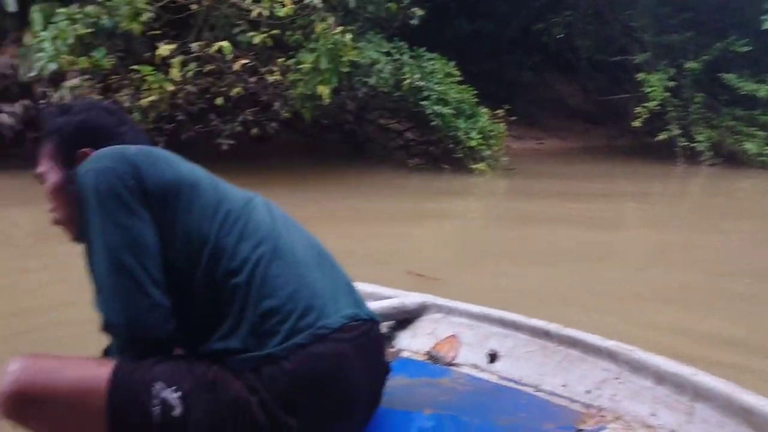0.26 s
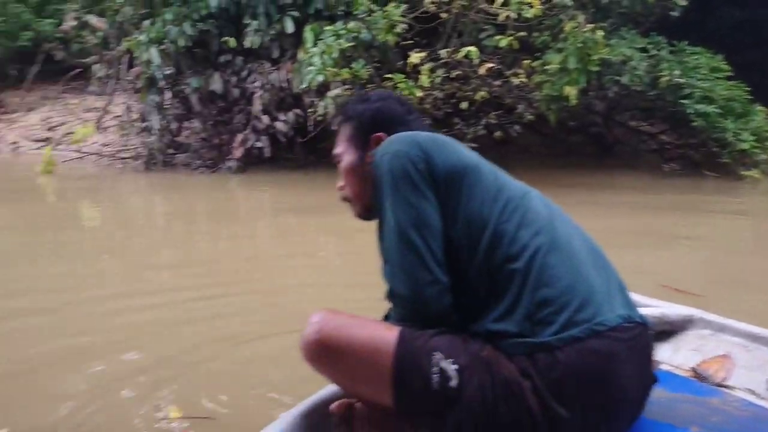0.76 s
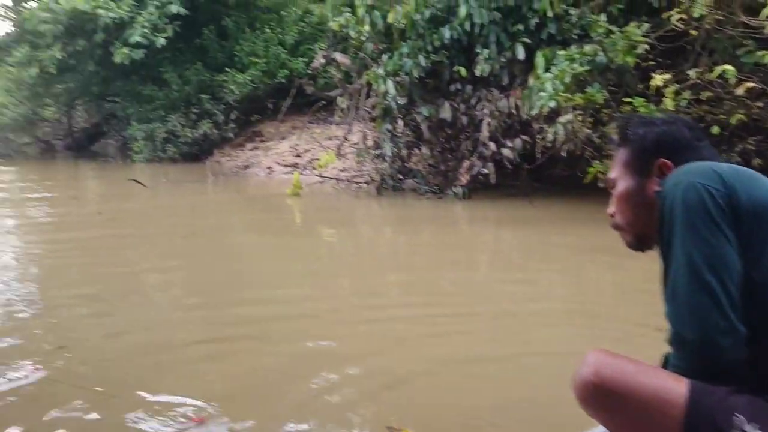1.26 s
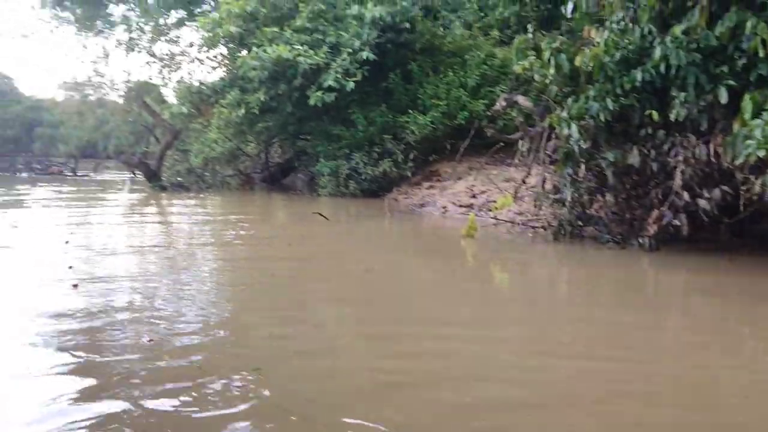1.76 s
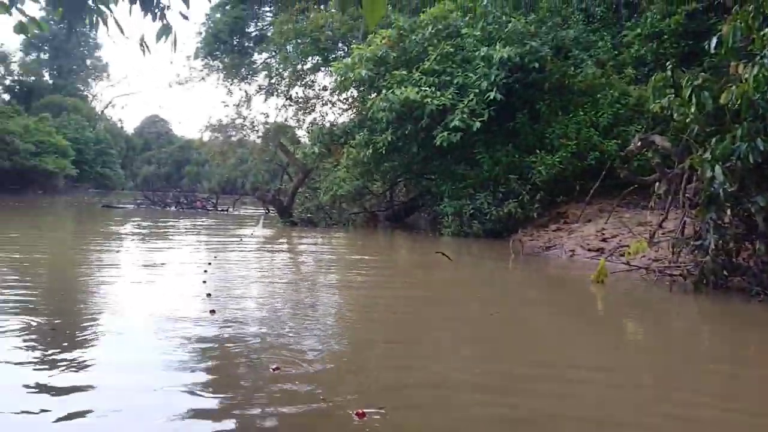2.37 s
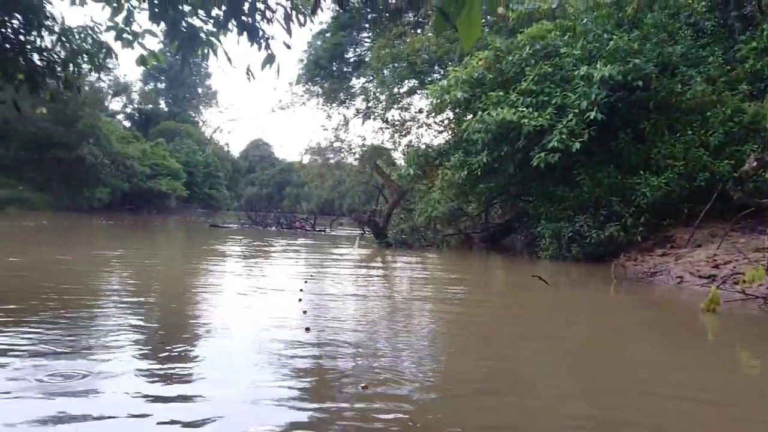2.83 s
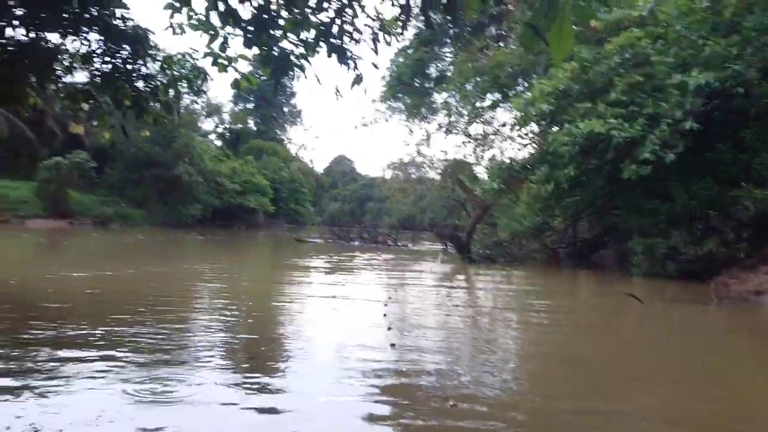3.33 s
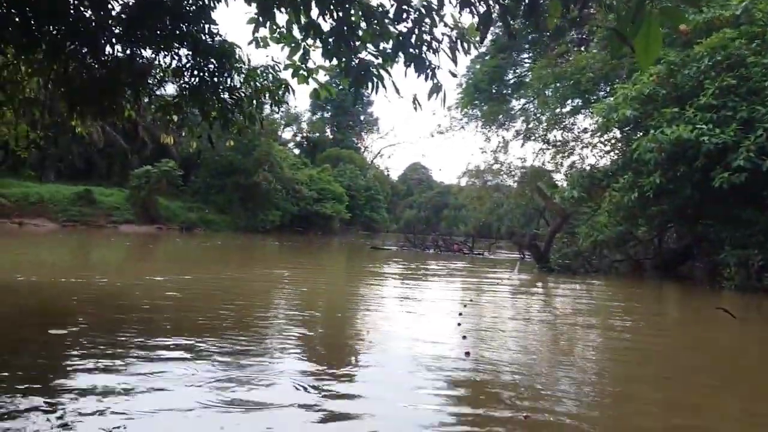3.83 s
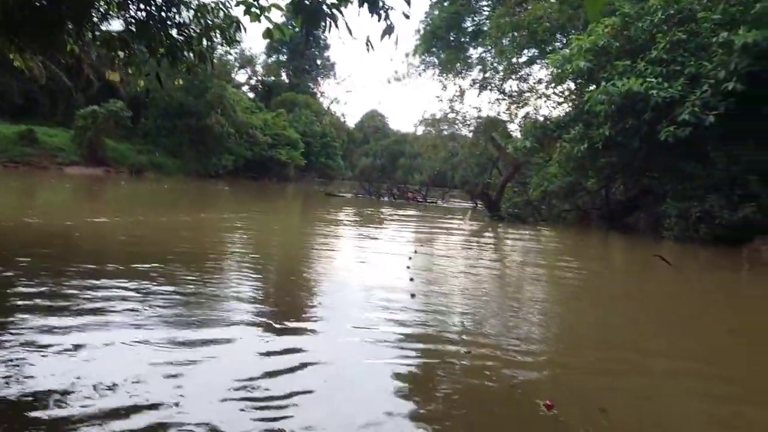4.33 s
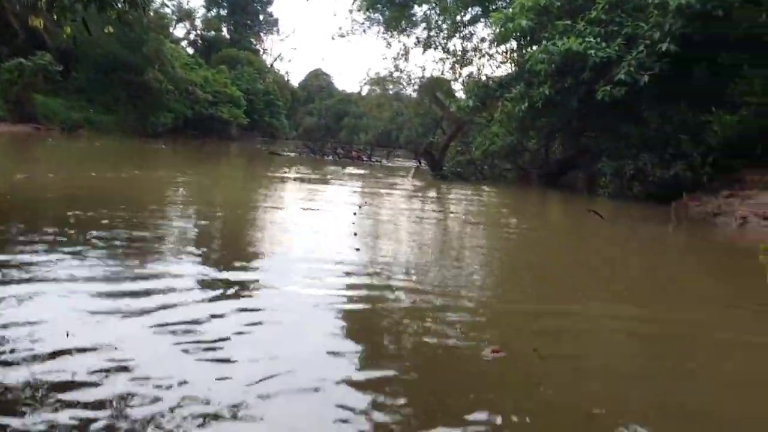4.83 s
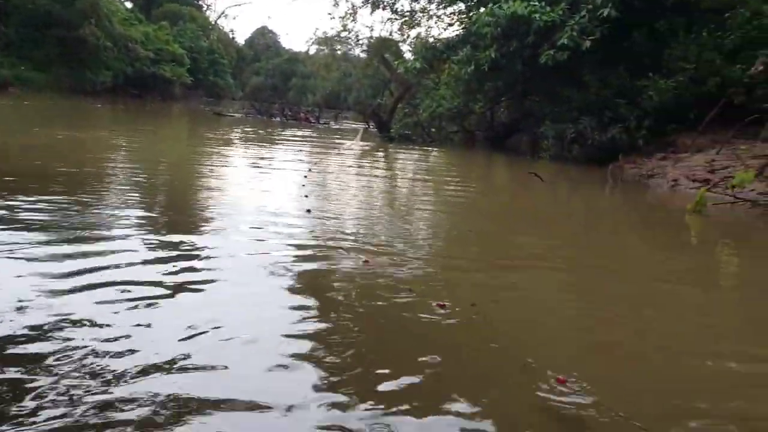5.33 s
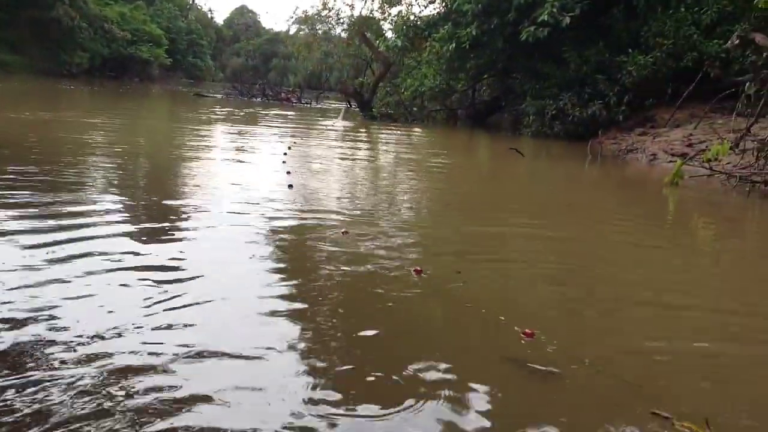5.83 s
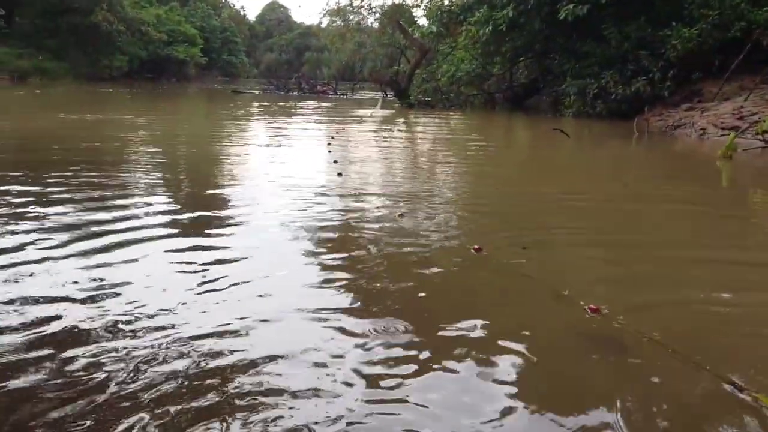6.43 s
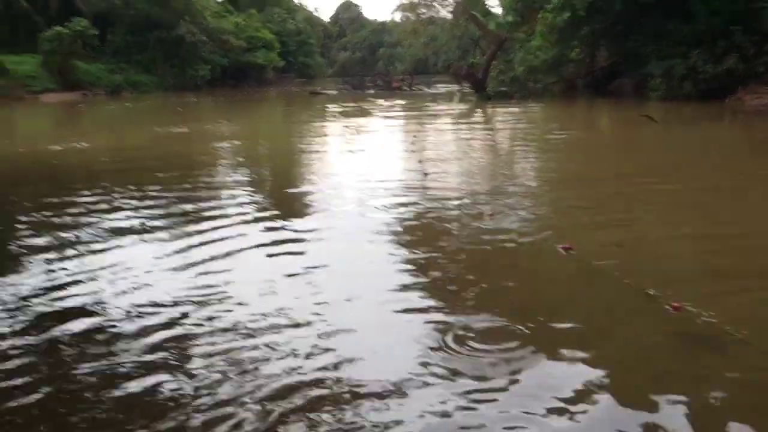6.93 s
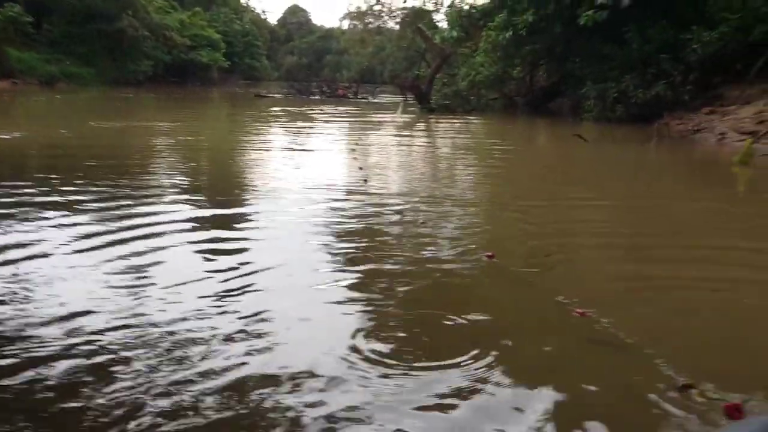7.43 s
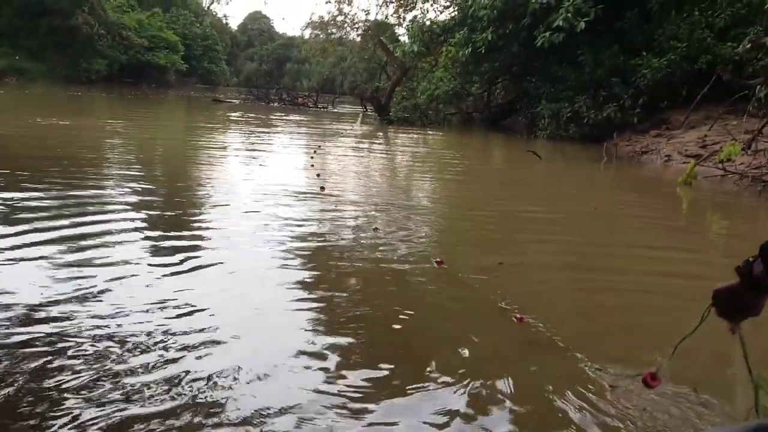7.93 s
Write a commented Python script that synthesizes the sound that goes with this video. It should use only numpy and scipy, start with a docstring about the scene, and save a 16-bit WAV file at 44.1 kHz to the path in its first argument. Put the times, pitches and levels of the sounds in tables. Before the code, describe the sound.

Close to the hull of a small metal boat on a quiet river, with faint low rumble and thin steady hiss. Water laps softly, with tiny rising bubbles, and net mesh rubs faintly with sparse knot ticks. A light tap opens; at 0.8 s a soft foot thump lands. Hollow knocks follow at 2.0 and 2.1 s, then a small watery blip at 2.5 and a clear, louder knock at 3.2. Bubbles and gulps cluster around 3.6. A dull boomy knock comes at 4.3, quick brighter taps at 5.3, and a muffled thump with a low gulp near 5.7. Light knocks continue from 5.9 as the rustle grows. At 7.1 to 7.3 a heavy cluster of thumps and hard clanks is by far the loudest moment. A deep gulp comes at 7.55, then low thuds near 8.1 as lapping and mesh rustle swell to the end.

```python
"""Net over the side of a metal boat

Afloat on a quiet river, a stereo microphone close to the hull and to the net being handled over its side.
Floats, weights and feet knock on the hull, once in a heavy cluster of thumps: filtered modes and noise.
Water laps as shaped noise; bubbles and air pockets gulp under the plates as gliding tones.
The mesh rustles as fluttering noise with knot ticks, swelling at the end, over low rumble and thin hiss.
"""
import sys
import numpy as np
from scipy import signal
from scipy.fft import rfft, irfft, next_fast_len
from scipy.io import wavfile

SR = 44100
rng = np.random.default_rng(int(sys.argv[2]) if len(sys.argv) > 2 else 0)


def to_wav(s):
    """Save 16-bit WAV."""
    ch = np.atleast_2d(s).T  # columns
    pcm = np.round(np.clip(ch, -1, 1) * 32767)  # PCM
    wavfile.write(sys.argv[1], SR, pcm.astype(np.int16))


N = 361399


def from_db(db):
    """Decibels to gain."""
    return 10 ** (np.asarray(db) / 20)


def rms_one(x):
    """Scale to unit rms."""
    return x / np.sqrt(np.mean(x ** 2) + 1e-20)


def level(rows):
    """Gain at every sample from rows of (t/s, level/dB)."""
    return from_db(np.interp(np.arange(N) / SR, *np.transpose(rows)))


def at_hz(points, hz):
    """Read a table on a log-frequency axis."""
    freqs, values = np.transpose(points)
    return np.interp(np.log(hz), np.log(freqs), values)


def cut(x, hz, kind, order=2):
    """Butterworth filter."""
    return signal.sosfilt(signal.butter(order, hz, kind, fs=SR, output="sos"), x)


def pan(db):
    """Left and right gains for a level difference; positive is louder on the left."""
    return from_db(np.array([[db], [-db]]) / 2)


def add(out, s, sound):
    """Mix a sound in at a time in seconds."""
    at = max(0, round(s * SR))
    out[:, at:at + sound.shape[-1]] += sound[..., :max(0, N - at)]


def flutter(rate):
    """Smooth chance with an rms of one, drawn anew `rate` times a second."""
    draws = rng.standard_normal(N // 40)
    return rms_one(np.interp(np.arange(N) / SR * rate, np.arange(N // 40), draws))


# how alike the two microphone sides hear a sound: f/Hz, left-right correlation [-1 to 1]
LIKENESS = [(60, .98), (300, .96), (550, .72), (1000, .5), (2500, .4), (5000, .1), (15000, 0)]


def stereo_noise(spectrum, size=N):
    """Coloured noise, alike on both sides in the bass and unrelated in the treble; rms 1."""
    padded = next_fast_len(size)
    hz = np.maximum(np.fft.rfftfreq(padded, 1 / SR), 1)
    mid, side = rfft(rng.standard_normal((2, padded)))
    alike = np.clip(at_hz(LIKENESS, hz), -1, 1)
    both = np.sqrt(1 + alike) * mid + np.sqrt(1 - alike) * side * [[1], [-1]]
    return rms_one(irfft(both * from_db(at_hz(spectrum, hz)), padded)[:, :size])


# swell of the ripples lapping on the hull, before the trim in river(): t/s, level/dB
LAP = [(0.0, -62), (0.29, -65.5), (0.96, -63.5), (1.73, -66.5), (2.26, -64), (2.51, -65), (5.7, -62),
       (5.79, -58), (6.34, -65), (6.57, -55.5), (6.98, -57), (7.23, -47.5), (7.66, -57), (8.19, -45)]
# colour of the lapping water: f/Hz, relative level/dB per Hz
WATER = [(90, 5.5), (200, 2.5), (400, -5.5), (700, -14.5), (1300, -19.5), (3000, -62.5), (8000, -53)]
# colour of the low rumble: f/Hz, relative level/dB per Hz
RUMBLE = [(25, -17), (38, -3), (52, 0.5), (80, 4), (110, -4), (170, -15.5), (300, -28), (1000, -39)]


def river(rumble_db, lap_db, lap_rough_db):
    """Ripples slap unevenly on the plates above a low, steady rumble."""
    unevenness = from_db(lap_db + lap_rough_db * flutter(rate=24))
    lapping = level(LAP) * stereo_noise(WATER) * unevenness
    rumble = from_db(rumble_db) * stereo_noise(RUMBLE)
    return (lapping + rumble) * pan(db=-3.5)


BUBBLES_FOLLOW = 0.7   # share of the lapping's swing in dB that the bubbles follow


def bubbles(bubble_db, low_hz, high_hz, cycles, rise, spread_db, count):
    """Small bubbles ring and rise in pitch; livelier water makes more and louder ones."""
    out, stir, t = np.zeros((2, N)), level(LAP), np.arange(SR // 8) / SR
    coarse = stir[::100]
    for when, size, loud, side in rng.random((count, 4)):
        # bubbles crowd where the lapping is loud
        at = np.searchsorted(np.cumsum(coarse), when * coarse.sum()) * 100
        hz = low_hz * (high_hz / low_hz) ** size
        age = t * hz / cycles  # reaches 1 when the ring has died by 60 dB
        tone = np.sin(2 * np.pi * hz * t * (1 + rise * age))
        ping = tone * from_db(-60 * age) * (1 - np.exp(-t * hz / 2))
        vigour = stir.mean() * (stir[min(at, N - 1)] / stir.mean()) ** BUBBLES_FOLLOW
        gain = vigour * from_db(bubble_db - spread_db * loud) * np.sqrt(low_hz / hz)
        add(out, at / SR, gain * ping * pan(8 * (side - .5) - 2))
    return out


# how hard the mesh slides over the side: t/s, level/dB of the pull
NET = [(0.0, -68.5), (0.27, -67.5), (0.89, -64), (1.14, -68.5), (3.59, -69.5), (4.1, -71), (4.81, -65.5),
       (5.19, -63.5), (5.66, -69), (5.98, -69), (6.7, -62), (6.9, -59.5), (7.08, -59), (7.42, -65),
       (7.674, -62.5), (7.912, -57), (8.03, -57), (8.19, -56)]
# colour of the rubbing mesh: f/Hz, relative level/dB per Hz
MESH = [(300, -13), (700, -3), (1300, -5), (2200, -1), (3200, -3), (4700, -0.5), (6500, -8), (7800, -9.5),
        (8700, -7), (12000, -9), (15500, -15)]
FULL_PULL_DB, PULL_SWING = -53, 1.49   # the curve at a full pull; dB of rustle per dB of the curve


def net(net_db, rough_db, knots_per_s, knots_db, sizzle_db, slosh_db):
    """Twine rubs unevenly, with sparse ticks from its knots; a hard pull adds sizzle and sloshing water."""
    haul = from_db(net_db) * (level(NET) / from_db(FULL_PULL_DB)) ** PULL_SWING
    pull = haul + shaken()
    force = (haul / haul.max()) ** 2
    rub = stereo_noise(MESH) * from_db(rough_db * flutter(rate=76))
    sizzle = from_db(sizzle_db) * rms_one(cut(rng.standard_normal((2, N)), 12000, "high"))
    slosh = from_db(slosh_db) * rms_one(cut(stereo_noise(MESH), [650, 1500], "band"))
    slosh = slosh * from_db(3.0 * flutter(rate=56))
    catches = (rng.random(N) < knots_per_s / SR) * rng.uniform(0, 1, N)
    tick_decay = np.exp(-1 / (0.00029 * SR))  # each knot's tick dies in a fraction of a millisecond
    ticks = signal.lfilter([1], [1, -tick_decay], catches + 1e-18)
    rustle = rub + force * sizzle + np.sqrt(force) * slosh
    return pull * rustle * (1 + from_db(knots_db) * ticks)


# colour of the microphone's hiss: f/Hz, relative level/dB per Hz
HISS = [(300, -0.5), (1500, -0.5), (4200, -0.5), (5200, -2.5), (7000, 10.5), (7700, -15.5), (8400, -15),
        (9500, -19), (10100, 4), (10700, -7), (13000, 4), (15500, 6)]
# narrow humps in the hiss: f/Hz, width/Hz, level/dB
HISS_PEAKS = [(6325, 430, -65), (6730, 74, -65), (6760, 56, -74.5), (8714, 810, -64), (8740, 150, -69.5)]


def hiss(hiss_db):
    """Microphone hiss with narrow humps in the treble."""
    out = from_db(hiss_db) * stereo_noise(HISS)
    for hz, width, db in HISS_PEAKS:
        edges = [hz - width / 2, hz + width / 2]
        out += from_db(db) * rms_one(cut(rng.standard_normal((2, N)), edges, "band"))
    return out


# main modes of the hull plates: f/Hz, relative level/dB, t60/s at a ring factor of 1
HULL = [(80, -5, 1), (146.3, -2.5, 0.47), (227, 1, 0.24), (296.9, 0, 0.11), (314, -5, 0.28),
        (349.7, -3, 0.18), (415.3, -7.5, 0.3), (478, -5.5, 0.27), (502.6, -9.5, 0.16), (544.6, -8.5, 0.31),
        (618.4, -11, 0.17), (710, -20, 0.38), (874.6, -10, 0.21), (1027, -17.5, 0.39), (1430, -4.5, 0.29),
        (1540, 6.5, 0.036), (1726, -4, 0.22), (1914, -7, 0.21), (2137, 2.5, 0.15)]


def plate_modes(t, ring, scatter_db):
    """The main modes, each with its own strength at each point of impact."""
    hz, db, t60 = np.transpose(HULL)[:, :, None]
    signs = np.resize([1, -1], hz.shape)  # neighbouring modes swing opposite ways
    strength = signs * from_db(db + scatter_db * rng.standard_normal(hz.shape))
    # short waves reach the two sides out of step
    apart = np.arccos(np.clip(at_hz(LIKENESS, hz), -1, 1)) * rng.choice([-1, 1], hz.shape)
    fade = strength * from_db(-60 * t / (t60 * ring))
    return np.array([(fade * np.sin(2 * np.pi * hz * t + side * apart / 2)).sum(0) for side in (1, -1)])


# the crowd of finer modes: f/Hz, relative level/dB per half octave, t60/s at a ring factor of 1
PLATE = [(70, -3.5, 0.31), (200, -0.5, 0.14), (454, -1, 0.2), (1030, 8.5, 0.079), (2200, 1, 0.14),
         (4430, 4.5, 0.13), (14000, 4, 0.15)]


def plate_wash(t, ring):
    """Countless fine modes as half-octave groups of noise, each dying at its own rate."""
    out, table = 0, np.array(PLATE)
    white = [stereo_noise([(30, 0), (16000, 0)], size=len(t)) for _ in range(2)]
    for k, hz in enumerate(np.geomspace(60, 15360, num=17)):
        db, t60 = (at_hz(table[:, [0, column]], hz) for column in (1, 2))
        # reversed, so the filter's slow start falls in the faded tail
        band = cut(white[k % 2], [hz / 2 ** .25, hz * 2 ** .25], "band")[:, ::-1]
        fade = from_db(-60 * t / (t60 * ring))
        out = out + from_db(db) * rms_one(band * fade) * np.sqrt(np.mean(fade ** 2))
    return out


def crack(t, t60, low_hz):
    """The contact itself, heard directly as a very short noise burst."""
    burst = cut(cut(rng.standard_normal(len(t)), low_hz, "high"), low_hz, "low", order=1)
    fade = from_db(-60 * t / t60)
    return rms_one(burst * fade) * np.sqrt(np.mean(fade ** 2))


def blow(low_hz, top_hz, ring, modes_db=-1.5, wash_db=-4.0, crack_db=2.5, grit_db=-17.0):
    """Every blow rings the same hull; the weight and hardness of the object set its band."""
    t = np.arange(SR // 2) / SR
    hull = from_db(modes_db) * plate_modes(t, ring, scatter_db=3.0)
    hull = hull + from_db(wash_db) * plate_wash(t, ring)
    hull = hull + from_db(crack_db) * crack(t, t60=0.0037, low_hz=890)
    hull = cut(hull, low_hz, "high", order=1)
    # a little grit on the metal keeps some treble even in a soft blow
    grit_edges = np.minimum(top_hz * np.array([1, 3.2]), .44 * SR)
    grit = cut(hull, grit_edges, "band", order=1)
    return cut(hull, top_hz, "low", order=4) + from_db(grit_db) * grit


SHOVE_DB, SHOVE_T60_S = 5, 0.046   # level relative to the thump, decay
SHOVE_SHARE = 0.682   # pitch as a share of the thump's top edge


def shove(hz):
    """A few heavily damped swings of the board giving way right under the weight."""
    t = np.arange(SR // 2) / SR
    fade = from_db(SHOVE_DB - 60 * t / SHOVE_T60_S)
    return fade * np.sin(2 * np.pi * hz * t) * (1 - np.exp(-4 * t * hz))


# feet and shifting weight on the boards: t/s, level/dB, low edge f/Hz, top edge f/Hz of the first touch
THUMPS = [(0.007, -40.5, 350, 620), (0.829, -29, 260, 512), (0.888, -40, 109, 527), (0.981, -40, 50, 100),
          (1.314, -51.5, 400, 700), (5.619, -41, 192, 560), (6.061, -50, 220, 665),
          (7.102, -21.5, 199, 376), (7.172, -20.5, 260, 377), (7.197, -21.5, 70.4, 123),
          (7.302, -30.5, 280, 450), (7.341, -38, 200, 314), (7.705, -38, 70, 200), (8.078, -29, 70, 135),
          (8.129, -26.5, 130, 140)]
THUMP_RING, THUMP_PAN_DB = 1, -2
# further touches as the weight settles: gap, loss and lowering of the band at each
SETTLE_S, SETTLE_LOSS_DB, SETTLE_DULLING = .03, 7, 0.77


def thumps(count):
    """A soft weight lands and settles in `count` touches, each weaker and deeper than the last."""
    out = np.zeros((2, N))
    for s, db, low_hz, top_hz in THUMPS:
        add(out, s, from_db(db) * shove(SHOVE_SHARE * top_hz))
        for k in range(count):
            dull = SETTLE_DULLING ** k
            touch = blow(low_hz * dull, top_hz * dull, THUMP_RING, wash_db=-3.5, grit_db=-26.0)
            add(out, s + k * SETTLE_S, from_db(db - k * SETTLE_LOSS_DB) * touch)
    return out * pan(THUMP_PAN_DB)


SHAKE_DB, SHAKE_GROWTH = -48, 1.6   # level for the heaviest thump; dB of rustle per dB of thump
SHAKE_RISE_S, SHAKE_FALL_S = 0.014, 0.092   # time constants of that rustle


def shaken():
    """Each thump sets the heaped mesh rustling for a moment."""
    out, t = np.zeros((1, N)), np.arange(SR) / SR
    heaviest_db = max(db for _, db, _, _ in THUMPS)
    swell = (1 - np.exp(-t / SHAKE_RISE_S)) * np.exp(-t / SHAKE_FALL_S)
    for s, db, _, _ in THUMPS:
        add(out, s, from_db(SHAKE_DB + SHAKE_GROWTH * (db - heaviest_db)) * swell)
    return out[0]


# hard floats and weights striking the hull; plate and boom are relative to the contact:
# t/s, contact level/dB, contact top edge f/Hz, plate level/dB, boom level/dB, left-right difference/dB
KNOCKS = [ (0.014, -47.5, 1880, 2, -9, -9), (0.861, -60, 3600, -4, -6, -17),
          (1.952, -48, 2630, -8, -11, -3.5), (2.104, -38.5, 2900, -8.5, -2, -1),
          (2.763, -54, 1300, -16, -7, 0), (3.164, -60.5, 1300, -4, -17, -7),
          (3.212, -29.5, 2850, -3.5, -0.5, -1.5), (3.7262, -63, 12100, -26, -20, -2),
          (4.277, -49.5, 2700, 8.5, 21.5, -2), (4.395, -54, 2200, 1.5, 9, 0.5),
          (5.262, -43.5, 3900, 5, -11, -2), (5.297, -41.5, 13000, -2.5, -18, 1.5),
          (5.333, -52.5, 1800, 6, -7, -2), (5.91, -51.5, 2550, 3, 13.5, -1), (6.11, -58, 2030, 3, 2, -2),
          (6.273, -53.5, 2530, -9.5, -15, 4), (6.446, -45.5, 2050, -0.5, -6, -13),
          (6.726, -47, 6200, 0.5, -18, -2.5), (6.937, -61, 2400, 14, 23.5, 0),
          (7.086, -27, 1500, -2.5, -18, -3), (7.197, -28, 3130, 7, 0, -3),
          (7.236, -38.5, 2700, -7, -8, -11), (7.2565, -29, 1580, -1.5, -11, -5.5),
          (7.407, -43.5, 1700, -24.5, 5, 1)]
CONTACT_LOW_HZ, CONTACT_RING = 970, 0.59   # low edge of the bright first touch; its ring time factor
# the struck plate answers, duller and longer
PLATE_LAG_S, PLATE_LOW_HZ, PLATE_TOP_HZ, PLATE_RING = 0.002877, 530, 1050, 1
# then the whole hull flexes
BOOM_LAG_S, BOOM_LOW_HZ, BOOM_TOP_HZ, BOOM_RING = .008, 367, 196, 0.68


def knocks():
    """A hard object: a bright contact, the ring of the plate, then the boom of the hull."""
    out = np.zeros((2, N))
    for s, db, top_hz, plate_db, boom_db, side_db in KNOCKS:
        gain = from_db(db) * pan(side_db)
        contact = blow(CONTACT_LOW_HZ, top_hz, CONTACT_RING,
                       modes_db=-5.5, wash_db=-5.0, crack_db=10.0, grit_db=-21.0)
        plate = blow(PLATE_LOW_HZ, PLATE_TOP_HZ, PLATE_RING, modes_db=-3.5, wash_db=-2.5, grit_db=-23.0)
        boom = blow(BOOM_LOW_HZ, BOOM_TOP_HZ, BOOM_RING)
        add(out, s, gain * contact)
        add(out, s + PLATE_LAG_S, gain * from_db(plate_db) * plate)
        add(out, s + BOOM_LAG_S, gain * from_db(boom_db) * boom)
    return out


# larger air pockets and drips ringing in the water: t/s, starting f/Hz, level/dB, length/s;
# f and level before the wobble, roughness and pan in gulps()
GULPS = [(2.311, 540, -52, 0.013), (2.474, 1130, -41, 0.025), (2.908, 450, -54, 0.032),
         (3.482, 516, -58, 0.12), (3.59, 255.4, -50, 0.1), (3.618, 600, -59, .04), (3.664, 814, -51, 0.017),
         (3.665, 1470, -41.5, 0.023), (3.673, 1110, -53, 0.048), (4.977, 1970, -53, .02),
         (5.085, 2190, -50.5, .015), (5.688, 205.6, -42, 0.15), (7.548, 218, -34, 0.12),
         (7.966, 535, -46, 0.25)]
GULP_RISE = 0.027   # share by which the pitch climbs as a pocket nears the surface


def gulps(swell, wobble, rough_db):
    """Trapped air swells into a tone and glides unsteadily as its pocket changes size."""
    out, shape = np.zeros((2, N)), flutter(rate=90)
    strength = from_db(rough_db * flutter(rate=44))
    for s, start_hz, db, length in GULPS:
        age = np.linspace(0, 1, max(int(length * SR), 2))
        now = np.minimum(int(s * SR) + np.arange(len(age)), N - 1)
        hz = start_hz * (1 + GULP_RISE * age) * (1 + wobble * shape[now])
        tone = strength[now] * np.sin(2 * np.pi * np.cumsum(hz) / SR)
        envelope = np.sin(np.pi * age ** swell) ** 2  # a swell below 1 peaks early
        add(out, s, from_db(db) * envelope * tone)
    return out * pan(db=-3.0)


PORT_LAG_S = .00033


def from_right(x):
    """Sound from the right reaches the left microphone port a little later."""
    t = np.arange(N) / SR
    return np.array([np.interp(t - PORT_LAG_S, t, x[0]), x[1]])


def scene():
    """Hull, water and net, all close by in the open air."""
    water = river(rumble_db=-57.0, lap_db=2.5, lap_rough_db=4.0)
    water += bubbles(bubble_db=12.5, low_hz=427, high_hz=3800, cycles=54, rise=0.068, spread_db=7.0, count=220)
    mesh = net(net_db=-43.0, rough_db=2.0, knots_per_s=8.3, knots_db=17, sizzle_db=-0.5, slosh_db=-0.5)
    hull = thumps(count=2) + knocks()
    water += gulps(swell=0.43, wobble=0.045, rough_db=1.0)
    return from_right(hull + water + mesh) + hiss(hiss_db=-58.5)


CUTOFF_HZ = 15600


def record(dry):
    """The deepest bass is cut, and the top ends steeply at the cutoff."""
    no_rumble = cut(dry, 44, "high", order=5)
    return signal.sosfilt(signal.ellip(10, .1, 80, CUTOFF_HZ, fs=SR, output="sos"), no_rumble)


dry = scene()
out = record(dry)
to_wav(out)
```